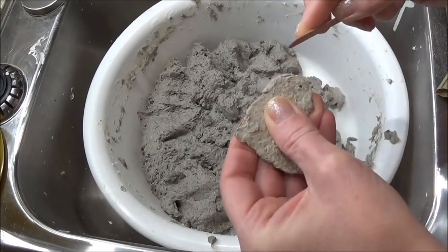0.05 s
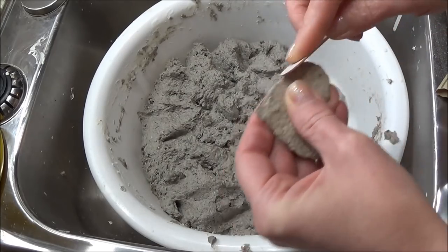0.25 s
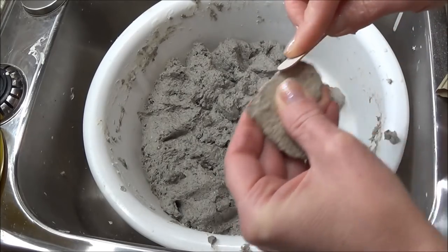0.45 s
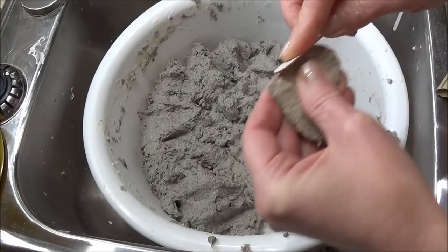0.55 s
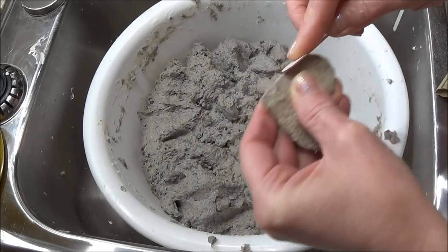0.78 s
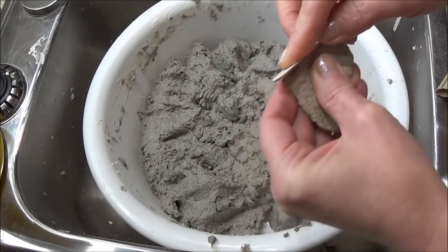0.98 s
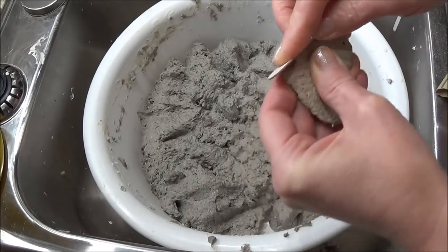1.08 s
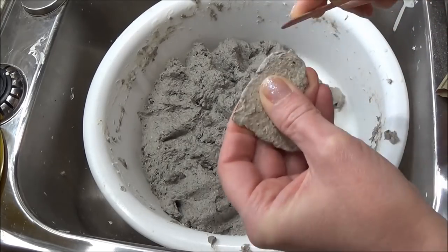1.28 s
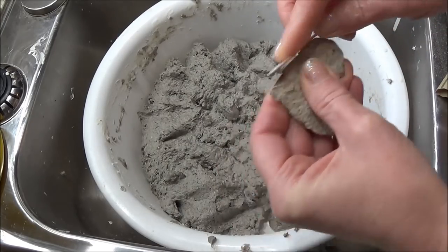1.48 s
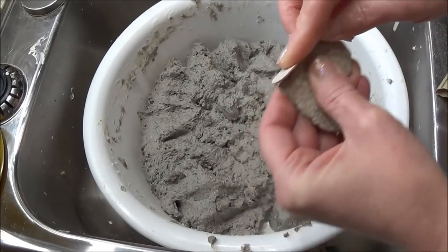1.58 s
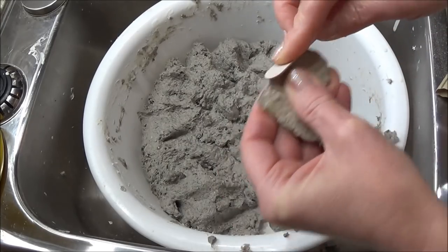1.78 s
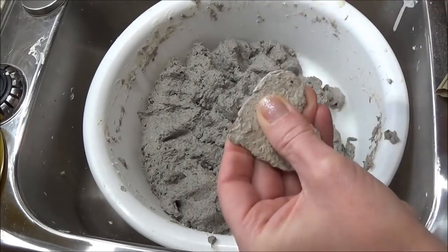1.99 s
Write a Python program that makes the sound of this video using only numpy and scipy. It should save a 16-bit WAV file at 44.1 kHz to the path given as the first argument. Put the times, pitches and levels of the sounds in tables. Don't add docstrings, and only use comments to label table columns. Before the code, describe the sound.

Nail file rubs quickly to and fro on a hard clay piece, a long run of crisp scratchy strokes, a short pause, a shorter run, then faint brushes; close microphone, quiet kitchen with refrigerator hum.

```python
import sys
import numpy as np
from scipy import signal
from scipy.io import wavfile

SR = 44100
rng = np.random.default_rng(int(sys.argv[2]) if len(sys.argv) > 2 else 0)


def dump_mix(stems):
    frames = np.atleast_2d(stems).T
    limited = np.clip(frames, -1, 1)
    pcm = np.round(limited * 32767).astype(np.int16)
    wavfile.write(sys.argv[1], SR, pcm)


def volts_from_db(level):
    exponent = np.asarray(level, float) / 20
    return 10 ** exponent


N = 90404
CLAY_LOW_CUT_HZ = 2184


def rms_one(x):
    return x / np.sqrt(np.mean(x ** 2) + 1e-20)


def at_hz(points, hz):
    table_hz, values = np.transpose(points)
    return np.interp(np.log(hz), np.log(table_hz), values)


def drift(rate_hz):
    r = np.exp(-2 * np.pi * rate_hz / SR)
    wander = signal.lfilter([1], [1, -2 * r, r * r], rng.standard_normal(N + SR))
    return rms_one(wander[SR:])


def resonate(x, hz, width_hz):
    r = np.exp(-np.pi * width_hz / SR)
    top = np.array([1, 0, -1]) * (1 - r * r) / 2
    return signal.lfilter(top, [1, -2 * r * np.cos(2 * np.pi * hz / SR), r * r], x)


def kitchen():
    # frequency in Hz, level in dB per Hz
    air = [(30, -12), (90, -10), (330, -9), (500, -11.5), (1300, -14.5), (1500, -17.5), (5000, -22),
           (16000, -32)]
    # frequency in Hz, likeness from -1 to 1
    likeness = [(300, 0.86), (1400, 0.76), (3500, 0.29), (8000, 0.31), (15000, 0.69)]
    # frequency in Hz, width in Hz, level in dB
    whirr_bands = [(353, 86, -67), (681.6, 47, -69), (1194, 600, -76.5)]
    # frequency in Hz, level in dB
    hum_tones = [(118.3, -63), (1181, -70.5), (1299, -73.5)]

    out, edges = 0, 1400 * 2 ** np.arange(-6, 3.7, .4)
    white = rng.standard_normal((2, 2, N))
    for k, (low, high) in enumerate(zip(edges, edges[1:])):
        hz = np.sqrt(low * high)
        alike = np.clip(at_hz(likeness, hz), -1, 1)
        band = signal.butter(3, [low, high], "band", fs=SR, output="sos")
        pair = signal.sosfilt(band, white[k % 2])
        out = out + volts_from_db(at_hz(air, hz)) * np.sqrt([[1 + alike], [1 - alike]]) * pair
    mid, side = volts_from_db(-60.5) * rms_one(out)
    side = signal.sosfilt(signal.butter(2, 500, "high", fs=SR, output="sos"), side)

    whirr = 0
    for hz, width_hz, db in whirr_bands:
        strength = volts_from_db(db + 1.5 * drift(2.7))
        once = resonate(rng.standard_normal(N), hz, width_hz)
        whirr = whirr + strength * rms_one(resonate(once, hz, width_hz))
    hum = 0
    for hz, db in hum_tones:
        hum = hum + volts_from_db(db + 2.5 + 0.4 * drift(12.0)) * np.sin(2 * np.pi * hz * np.arange(N) / SR)
    return mid + side * [[1], [-1]] + whirr + hum


def hand():
    # start in seconds, length in seconds, level in dB, fastest point from 0 to 1,
    # landing this far under it in dB
    first_run = [(0.1424, 0.042, -30.5, 0.05, 2.1), (0.199, 0.037, -30, 0.26, 18),
                 (0.2447, 0.043, -31.5, 0.68, 24), (0.302, 0.042, -29, 0.53, 27),
                 (0.3656, 0.034, -31.5, 1, 3.5), (0.423, 0.035, -34, 1, -4),
                 (0.4752, 0.043, -30.5, 0.62, 11), (0.532, 0.04, -32, 0.7, 20),
                 (0.59, 0.035, -31, 0.27, 12), (0.644, 0.039, -31, 0.73, 27.5),
                 (0.7013, 0.036, -32, 0.86, 12), (0.76, 0.035, -31.5, 0.35, 12),
                 (.8135, 0.03, -31.5, 1, 10.5), (0.871, 0.036, -32.5, 0.55, 8),
                 (0.9282, 0.037, -31.5, 0.9, 4.5), (0.987, 0.036, -33, 0.47, 14),
                 (1.042, 0.033, -32, 0.63, 18), (1.1041, 0.037, -30.5, 0.57, 2.5)]
    second_run = [(1.4617, 0.021, -28.5, 0.13, 1.3), (1.514, 0.029, -37, 0.78, 12),
                  (1.5643, 0.032, -32, 0.39, 9), (1.617, 0.037, -30.5, 0.41, 25),
                  (1.6774, 0.033, -32, 0.83, 8), (1.732, 0.037, -30.5, 0.51, 20),
                  (1.7945, 0.03, -30, 0.88, 8.2), (1.85, 0.038, -31, 0.13, 4.5)]
    brushes = [
        (1.139, 0.035, -45.5, .1, 3),
        (1.887, .035, -48.5, 0.11, 3),
        (1.935, 0.023, -57.5, 0.64, 6.8),
        (2.027, 0.047, -62, 0.51, 3),
    ]

    end_drop_db, curve = 6, 2.66
    land_db_per_s, lift_db_per_s = 9000, 2497
    t, power = np.arange(N) / SR, np.zeros(N)
    for start, length, db, top, land_db in first_run + second_run + brushes:
        u = np.clip((t - start) / length, 0, 1)
        top = np.clip(top, .05, .95)
        landing = land_db * np.maximum(1 - u / top, 0) ** curve
        lifting = end_drop_db * np.maximum((u - top) / (1 - top), 0) ** curve
        before = land_db_per_s * np.maximum(start - t, 0)
        after = lift_db_per_s * np.maximum(t - start - length, 0)
        power += volts_from_db(np.maximum(db - (landing + lifting) - (before + after), -200)) ** 2
    return np.sqrt(power)


def grit():
    grains_per_s, spread_db = 16000, 3.3
    bump_db, bumps_per_s = 1.15, 290
    sizes = volts_from_db(spread_db * np.minimum(rng.exponential(1, N), 5)) * rng.choice([-1, 1], N)
    catches = sizes * (rng.random(N) < grains_per_s / SR)
    return rms_one(catches) * volts_from_db(bump_db * drift(bumps_per_s))


def body(x, peaks, wander_db):
    out = 0
    for k, (hz, width_hz, db) in enumerate(peaks):
        strength = (-1) ** k * volts_from_db(db + wander_db * drift(15.5))
        out = out + strength * resonate(x, hz, width_hz)
    return out


def sanding(level):
    # time in seconds, peak level in dB
    ticks = [
        (.1426, -9),
        (0.1586, -11),
        (.1972, -21),
        (0.3002, -22),
        (0.329, -21),
        (1.0527, -13),
        (1.462, -8.5),
        (1.7945, -14),
        (1.848, -28),
    ]
    # time in seconds, brightness in dB
    brightness = [(.14, 2), (.25, 8.5), (.6, 8.5), (.9, 6.1), (1.15, 10.5), (1.46, 4), (1.53, 1.5),
                  (1.62, 6.4), (1.9, 8.5)]
    # frequency in Hz, width in Hz, level in dB
    clay_peaks = [(2683, 350, 7.44), (3240, 133, 11.06), (3580, 105, 9.4), (3910, 267, 9),
                  (5460, 420, -4.5), (6253, 513, -11.5)]
    board_peaks = [(8190, 4500, -1), (10010, 1400, 5.3), (12000, 2270, 2), (14050, 1310, 6),
                   (15600, 2500, 5.0)]
    thud_peaks = [(383, 54, -12), (669, 260, -9.5), (1020, 950, -14.5), (1990, 1800, -12.5)]

    bright_db = np.interp(np.arange(N) / SR, *np.transpose(brightness))
    rub = level * grit()
    for s, db in ticks:
        rub[int(s * SR)] += volts_from_db(db)
    low_cut = signal.butter(4, CLAY_LOW_CUT_HZ, "high", fs=SR, output="sos")
    clay = volts_from_db(-1 - bright_db / 2) * body(rub, clay_peaks, 1.4)
    board = volts_from_db(-0.83 + bright_db / 2) * body(rub, board_peaks, .7)
    return signal.sosfilt(low_cut, clay + board) + body(rub, thud_peaks, 2.0)


def knocks():
    # time in seconds, peak level in dB
    jolts = [(0.151, -38), (0.218, -51), (.385, -39), (.48, -39.5), (0.601, -40.5), (.728, -34),
             (.927, -36.5), (0.956, -36.5), (1.057, -45), (1.461, -58), (1.585, -36.5), (1.639, -41.5),
             (1.705, -36.5), (1.803, -36), (1.855, -45)]
    # frequency in Hz, level in dB, time to fade by 60 dB in seconds
    knock_modes = [(370, -7, .05), (670, 0, .075), (1060, -6, .05)]

    out, chance = np.zeros(N), rng.normal(0, 1, (len(jolts), 3))
    for k, (hz, level_db, t60_s) in enumerate(knock_modes):
        clicks = np.full(N, 1e-18)
        for (s, db), c in zip(jolts, chance):
            clicks[int(s * SR)] = volts_from_db(db - 7.5 + level_db + 2 * c[k])
        r, w = volts_from_db(-60 / (t60_s * SR)), 2 * np.pi * hz / SR
        out += signal.lfilter([0, np.sin(w)], [1, -2 * r * np.cos(w), r * r], clicks)
    return signal.lfilter([.15], [1, -.85], out)


def sink(x):
    # delay in seconds, left level in dB, right level in dB
    echoes = [(.0007, -54, -14.5), (.0015, -51.5, -68.5), (.0024, -26, -15)]

    tail_db, t60_s, alike = -10.5, 0.11, 0.13
    t = np.arange(SR // 4) / SR
    mid, side = rng.standard_normal((2, len(t)))
    side = signal.sosfilt(signal.butter(2, 1500, "high", fs=SR, output="sos"), side)
    tail = np.sqrt(1 + alike) * mid + np.sqrt(1 - alike) * side * [[1], [-1]]
    tail = tail * volts_from_db(-60 * t / t60_s) * (t > .003)
    reply = volts_from_db(tail_db) * tail / np.sqrt(np.sum(tail ** 2) / 2)
    reply[:, 0] = 1
    for s, left_db, right_db in echoes:
        reply[:, int(s * SR)] += volts_from_db(left_db), volts_from_db(right_db)
    return signal.fftconvolve(x[None], reply, axes=1)[:, :N]


def scene():
    width_db, pan_db = -14.5, -.3
    level = hand()
    low_cut = signal.butter(2, CLAY_LOW_CUT_HZ, "high", fs=SR, output="sos")
    wide = volts_from_db(width_db) * signal.sosfilt(low_cut, sanding(level)) * [[1], [-1]]
    rubbing = sink(sanding(level) + knocks()) + wide
    return rubbing * volts_from_db(pan_db * np.array([[1], [-1]])) + kitchen()


def roll_off(x):
    return signal.sosfilt(signal.butter(12, 16990, fs=SR, output="sos"), x)


def record(dry):
    top_cut = signal.ellip(12, .5, 70, 15750, fs=SR, output="sos")
    return roll_off(signal.sosfilt(top_cut, dry))


dry = scene()
out = record(dry)
dump_mix(out)
```